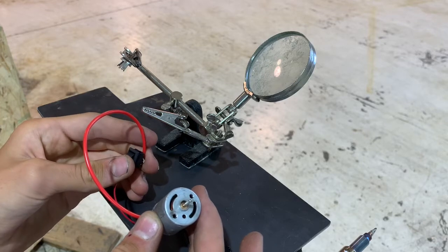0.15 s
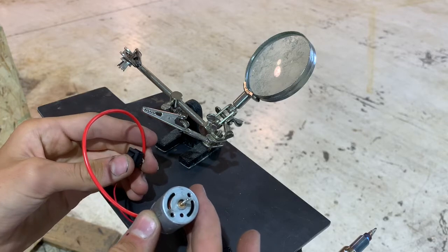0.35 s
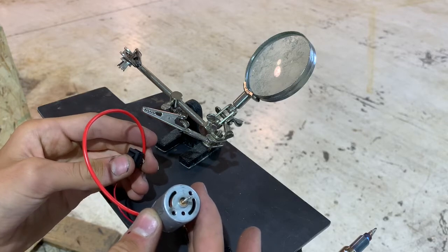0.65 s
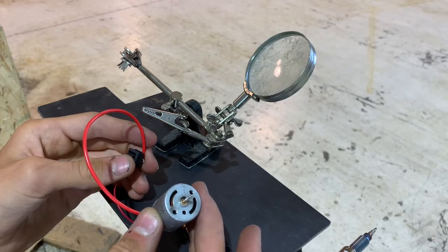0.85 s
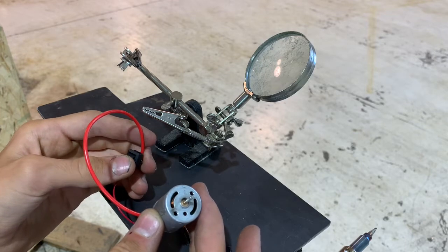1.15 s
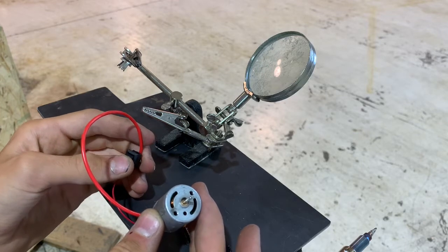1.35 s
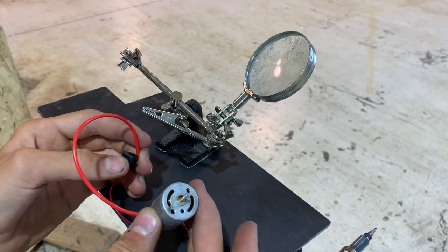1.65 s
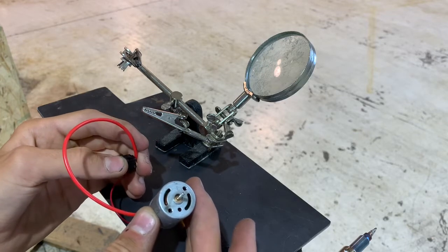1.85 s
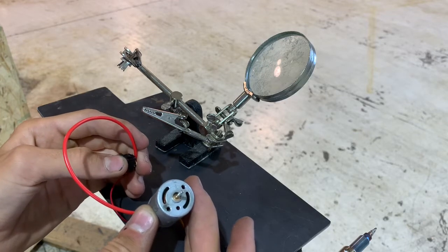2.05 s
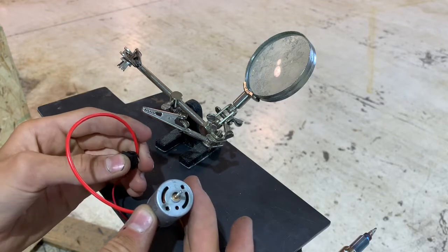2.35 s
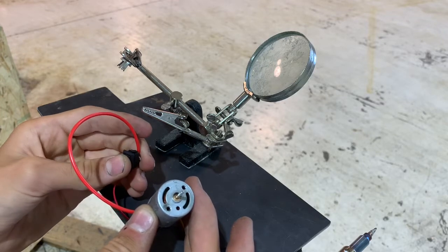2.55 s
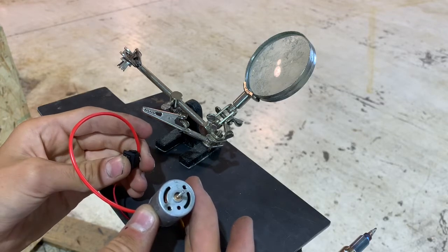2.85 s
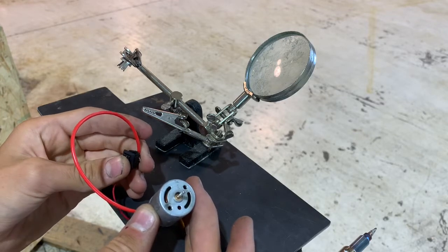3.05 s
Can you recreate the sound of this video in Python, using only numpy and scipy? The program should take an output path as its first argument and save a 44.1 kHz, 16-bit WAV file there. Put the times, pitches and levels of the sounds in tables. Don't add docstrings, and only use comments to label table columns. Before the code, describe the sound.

A small electric motor whirs to a stop, clicks on, and spins up to a high whine

```python
import sys
import numpy as np
from scipy import signal
from scipy.fft import rfft, irfft, next_fast_len
from scipy.io import wavfile
from scipy.ndimage import uniform_filter1d

SR = 44100
rng = np.random.default_rng(int(sys.argv[2]) if len(sys.argv) > 2 else 0)


def unload_wav(signal):
    wavfile.write(
        sys.argv[1],
        SR,
        np.round(np.clip(np.atleast_2d(signal).T, -1, 1) * 32767).astype(np.int16),
    )


def rack_gain(trim_db):
    fader = np.asarray(trim_db, float)
    return 10 ** (fader / 20)


N = 141120
FULL_TURNS_PER_S = 300


def rms_one(x):
    return x / np.sqrt(np.mean(x ** 2) + 1e-20)


def in_time(rows):
    s, *columns = np.transpose(rows)
    return [np.interp(np.arange(N) / SR, s, c) for c in columns]


def drift(rate_hz):
    r = np.exp(-80 * np.pi * rate_hz / SR)
    noise = rng.standard_normal(N // 40 + 2002)
    slow = signal.lfilter([1], [1, -2 * r, r * r], noise)[2000:]
    return np.interp(np.arange(N) / 40, np.arange(len(slow)), rms_one(slow))


def cut(x, hz, kind):
    return signal.lfilter(*signal.butter(1, min(hz, .45 * SR), kind, fs=SR), x)


def with_speed(speed, db, db_per_oct):
    octaves = np.log2(speed / FULL_TURNS_PER_S + 1e-4)
    return rack_gain(db + db_per_oct * octaves) * (speed > 0)


# (time [s], speed [turns/s])
SHAFT_SPEED = [(0, 223.6), (.18, 178.7), (.486, 111.9), (.75, 53.0), (.9, 21.0), (.99, 0), (1.735, 0),
               (1.8, 68.0), (1.88, 128.0), (1.952, 180.0), (2.092, 236.3), (2.244, 275.3), (2.42, 295.0),
               (2.6, 310.0), (2.7, 318.9), (2.824, 328.0), (3.002, 336.6), (3.092, 339.1), (3.2, 308.8)]
# (time [s], rattle [dB], brush [dB])
SHAFT_PLAY = [
    (0, -1, -2.5),
    (.5, 0.5, 1),
    (.8, -3, 3),
    (1.0, -15, -3.5),
    (1.7, 1.5, 1.5),
    (2.15, 1.5, -6.5),
    (2.555, 0, -3.5),
    (2.575, -10.5, -7.5),
    (3.2, -14.5, -5),
]


def motor():
    speed = uniform_filter1d(in_time(SHAFT_SPEED)[0], size=900)
    turns = np.cumsum(speed) / SR
    turns = turns - turns[int(1.2 * SR)]
    rattle_db, brush_db = in_time(SHAFT_PLAY)
    shaking = rack_gain(brush_db) * brushes(speed, turns) + rattle(speed, rattle_db)
    return can(shaking) + orders(speed, turns, rattle_db)


GAP_LEVELS = [-2.5, -5, -5]
TICK_DB, TICK_DB_PER_OCT, TICK_SPREAD_DB = -1, 4, 1.1
TICK_OFFSET_GAPS, TICK_DECAY_S, TICK_CUT_HZ = .45, 0.00038, 6000
HISS_DB, HISS_DB_PER_OCT, HISS_CUT_HZ = -26, 5.5, 1400


def brushes(speed, turns):
    gap = np.floor(3 * turns + TICK_OFFSET_GAPS).astype(int)
    hit = np.diff(gap, prepend=gap[0]) > 0
    hit_db = np.array(GAP_LEVELS)[gap % 3] + TICK_SPREAD_DB * rng.standard_normal(N)
    envelope = signal.lfilter([1], [1, -np.exp(-1 / (TICK_DECAY_S * SR))], hit * rack_gain(hit_db))
    scratch = envelope * rng.standard_normal(N)
    ticks = cut(cut(scratch, TICK_CUT_HZ, "low"), TICK_CUT_HZ, "low")
    hiss = rms_one(cut(rng.standard_normal(N), HISS_CUT_HZ, "low"))
    ticks = with_speed(speed, TICK_DB, TICK_DB_PER_OCT) * ticks
    return ticks + with_speed(speed, HISS_DB, HISS_DB_PER_OCT) * hiss


RATTLE_DB, RATTLE_DB_PER_OCT, RATTLE_PATCHY_DB = -20.5, 9.5, 0.97
KNOCKS_PER_TURN, KNOCK_SPREAD_DB, KNOCK_LOW_HZ = 24.0, 1.37, 2400


def rattle(speed, play_db):
    sizes = rack_gain(KNOCK_SPREAD_DB * np.minimum(rng.exponential(1, N), 5)) * rng.choice([-1, 1], N)
    hit = rng.random(N) < KNOCKS_PER_TURN * speed / SR
    knocks = rms_one(cut(sizes * hit, KNOCK_LOW_HZ, "high"))
    patchy_db = RATTLE_PATCHY_DB * (drift(9.2) + drift(80))
    return with_speed(speed, RATTLE_DB + play_db + patchy_db, RATTLE_DB_PER_OCT) * knocks


# (frequency [Hz], width [Hz], level [dB])
CAN_MODES = [(829, 400, -26.5), (1400, 600, -21.5), (1790, 900, -23.5), (3547, 377, -8.5),
             (4670, 610, -15.5), (5750, 950, -13.5), (7280, 650, -6), (8970, 850, -4.5), (9707, 101, 4),
             (10100, 800, -1.5), (10280, 550, 4.5), (13000, 1100, -9), (15010, 1100, -6),
             (15800, 310, -4.5)]


def can(x):
    out = 0
    for k, (hz, width_hz, db) in enumerate(CAN_MODES):
        r = np.exp(-np.pi * width_hz / SR)
        zeros = (1 - r * r) / 2 * np.array([1, 0, -1])
        poles = [1, -2 * r * np.cos(2 * np.pi * hz / SR), r * r]
        out = out + (-1) ** k * rack_gain(db) * signal.lfilter(zeros, poles, x + 1e-18)
    return out


# (multiple of shaft speed, rms at full speed [dB], slope [dB/octave], share of rattle swing)
LOW_SHAFT_ORDERS = [(1, -76, 8, 0), (3, -46, 24, .5), (5, -67, 10, 0), (6, -66, 8, 0), (7, -54, 15, 1.6),
                    (9, -60, 13, .5), (12, -47, 55, 0), (15, -64, 12, 0), (24, -53, 14, .3)]
# (multiple of shaft speed, level [dB])
HIGH_SHAFT_ORDERS = [(27, -45), (28, -49), (29, -44), (30, -42), (31, -48), (32, -44), (33, -44), (35, -49),
                     (36, -46), (39, -49), (41, -54), (42, -54), (43, -53), (44, -55), (45, -46), (47, -52),
                     (48, -45)]
# (frequency [Hz], level [dB])
CAP_RADIATION = [(6000, -16), (8200, -9), (9100, -5), (9700, 4), (10200, 2), (11000, -8), (13000, -2),
                 (14500, 2), (15300, -5)]
HIGH_DB_PER_OCT, WAVER_DB, WOBBLE_RAD = 8.0, 3.2, .006


def orders(speed, turns, play_db):
    angle = 2 * np.pi * turns + WOBBLE_RAD * drift(37)

    def line(k, waver_share):
        waver = rack_gain(waver_share * WAVER_DB * drift(4.3))
        return np.sqrt(2) * waver * np.sin(k * angle + rng.uniform(0, 2 * np.pi))

    out = np.zeros(N)
    for k, db, slope, share in LOW_SHAFT_ORDERS:
        out += with_speed(speed, db + share * play_db, slope) * line(k, .45)
    for k, db in HIGH_SHAFT_ORDERS:
        cap_db = np.interp(k * speed, *np.transpose(CAP_RADIATION))
        out += with_speed(speed, db + cap_db, HIGH_DB_PER_OCT) * line(k, 0.84)
    return out


# (time [s], level [dB])
CONTACT_SNAPS = [
    (1.7267, -49),
    (1.7274, -21),
    (1.7281, -31),
    (1.7324, -41),
]
# (frequency [Hz], level [dB], t60 [s])
SWITCH_MODES = [(4180, -9, 0.02), (6600, -35, 0.0028), (8120, -13, 0.009), (9400, -10, 0.0068),
                (11500, 1.5, 0.0064), (12400, -7, .005), (14300, -13, .005), (16000, -17, 0.0055)]


def switch():
    out = np.zeros(N)
    for hz, mode_db, t60_s in SWITCH_MODES:
        clicks = np.zeros(N)
        for s, db in CONTACT_SNAPS:
            clicks[int(s * SR)] = rack_gain(db + mode_db + rng.normal(0, 4.7)) * rng.choice([-1, 1])
        r, w = rack_gain(-60 / (t60_s * SR)), 2 * np.pi * hz / SR
        out += signal.lfilter([0, np.sin(w)], [1, -2 * r * np.cos(w), r * r], clicks + 1e-18)
    return out


ROOM_GAP = [2250, 3000]
ROOM_DB, ROOM_T60_S, WALL_CUT_HZ = -14, 0.19, 3300


def room(x):
    t = np.arange(SR // 2) / SR
    tail = cut(rng.standard_normal((2, len(t))), WALL_CUT_HZ, "low")
    tail = tail * rack_gain(-60 * t / ROOM_T60_S) * (t > .004)
    tail = tail / np.sqrt(np.sum(tail ** 2) / 2)
    x = signal.sosfilt(signal.butter(2, ROOM_GAP, "bandstop", fs=SR, output="sos"), x)
    return signal.fftconvolve(x[None], tail, axes=1)[:, :N]


# (frequency [Hz], level [dB per Hz])
AIR_SPECTRUM = [(20, -37), (40, -3.5), (130, -5), (300, -5), (700, -16.5), (2000, -23), (7000, -30),
                (16000, -35.5)]
# (frequency [Hz], correlation)
AIR_LIKENESS = [(60, .93), (200, 1), (330, 0.22), (5000, .1), (16000, .3)]
# (frequency [Hz], rms [dB])
MAINS_HUM = [(120, -77), (240, -79), (600, -74), (840, -86), (960, -81), (1080, -92), (1200, -89),
             (1320, -90), (1440, -92), (1560, -90), (1680, -90), (1800, -92), (2280, -95), (2400, -94),
             (2880, -100), (6600, -97)]
AIR_DB, HUM_LIFT_DB, HUM_WAVER_DB = -66.5, 4.0, 3.45


def workshop():
    hz = np.maximum(np.arange(N // 2 + 1) * SR / N, 5)

    def curve(points):
        at_hz, value = np.transpose(points)
        return np.interp(np.log(hz), np.log(at_hz), value)

    mid, side = rfft(rng.standard_normal((2, N))) * rack_gain(curve(AIR_SPECTRUM))
    alike = np.clip(curve(AIR_LIKENESS), 0, 1)
    air = irfft(np.sqrt(1 + alike) * mid + np.sqrt(1 - alike) * side * [[1], [-1]], N)
    t = np.arange(N) / SR
    hum = np.zeros((2, N))
    for f, db in MAINS_HUM:
        level = np.sqrt(2) * rack_gain(db + HUM_LIFT_DB + HUM_WAVER_DB * drift(4.2))
        phase = rng.uniform(0, 4.66) + rng.normal(0, 0.45, (2, 1))
        hum += level * np.sin(2 * np.pi * f * t + phase)
    return rack_gain(AIR_DB) * rms_one(air) + hum


def scene():
    near = motor() + switch()
    return near + rack_gain(ROOM_DB) * room(near) + workshop()


# (frequency [Hz], left lead [rad], left-right level
# [dB])
CHANNEL_OFFSETS = [(200, 0.067, 0), (900, 1.42, 2), (1820, 1.6, 3), (2350, 3.12, 0), (2950, 3.16, 0),
                   (4020, 8.8, -2), (4300, 9.5, 0), (3420, 8.06, 3.5), (5520, 13.8, -6), (5880, 11.9, -6),
                   (7150, 15.64, 6), (7280, 15.04, -0.5)]
PORT_COMB_HZ, PORT_IN_STEP_HZ = 4820, 9325
ONE_PORT_HZ = 7540


def microphone(dry):
    size = next_fast_len(N + 4096)
    hz = np.arange(size // 2 + 1) * SR / size
    at_hz, lead_rad, db = np.transpose(sorted(CHANNEL_OFFSETS))
    lag = 4 * np.pi - 2 * np.pi * (hz - PORT_IN_STEP_HZ) / PORT_COMB_HZ
    lead = np.where(hz > at_hz[-1], lag, np.interp(hz, at_hz, lead_rad))
    half = rack_gain(np.interp(hz, at_hz, db) / 2) * np.exp(.5j * lead)
    ports = rfft(dry, size)
    ports[1] = np.where(hz > ONE_PORT_HZ, ports[0], ports[1])
    return irfft(ports * half[None] ** np.array([[1], [-1]]), size)[:, :N]


def roll_off(x):
    return signal.sosfilt(signal.butter(12, 16810, fs=SR, output="sos"), x)


def record(dry):
    mix = microphone(dry)
    return roll_off(mix)


dry = scene()
out = record(dry)
unload_wav(out)
```